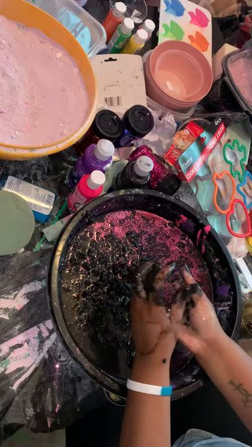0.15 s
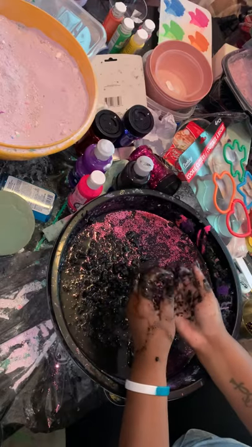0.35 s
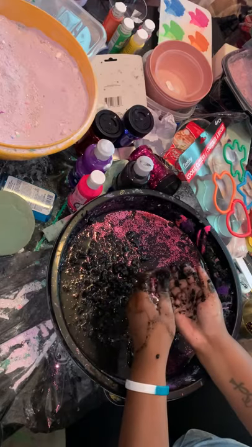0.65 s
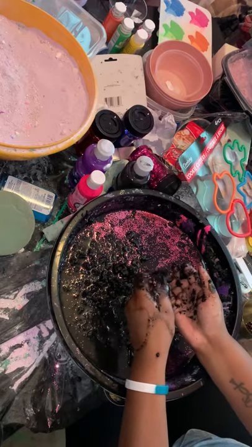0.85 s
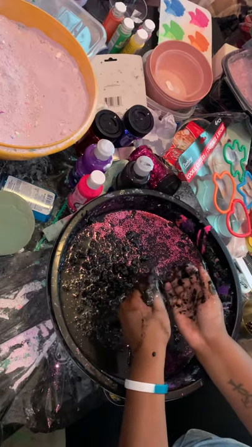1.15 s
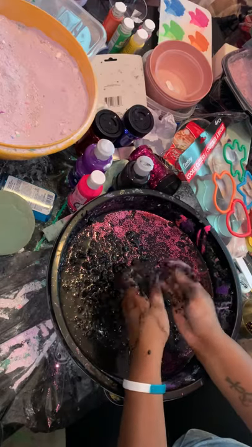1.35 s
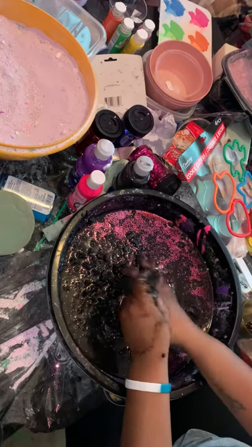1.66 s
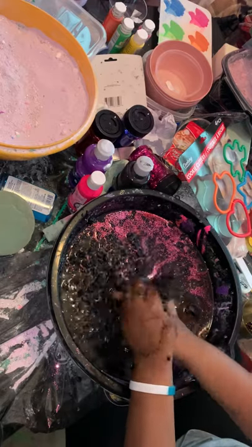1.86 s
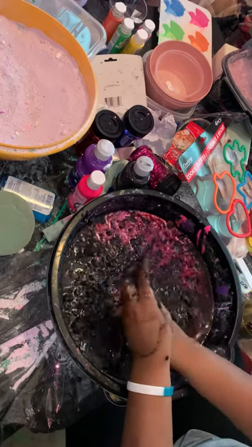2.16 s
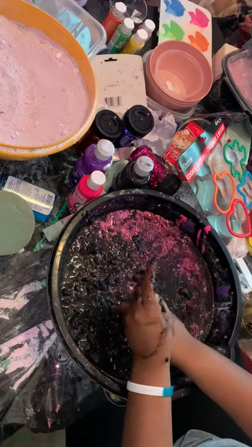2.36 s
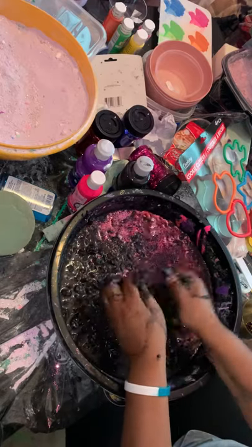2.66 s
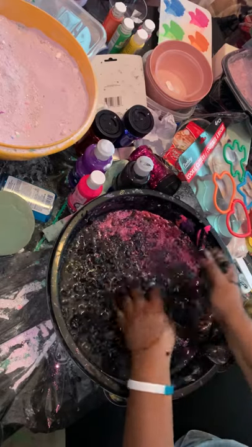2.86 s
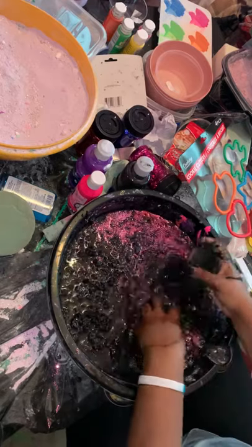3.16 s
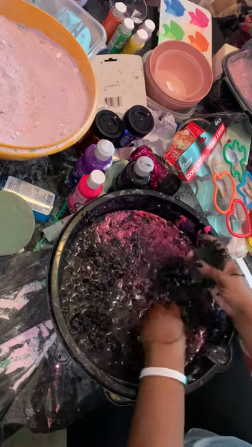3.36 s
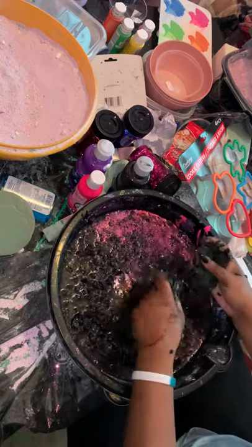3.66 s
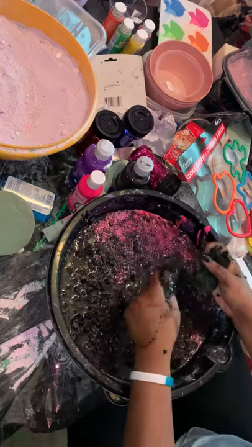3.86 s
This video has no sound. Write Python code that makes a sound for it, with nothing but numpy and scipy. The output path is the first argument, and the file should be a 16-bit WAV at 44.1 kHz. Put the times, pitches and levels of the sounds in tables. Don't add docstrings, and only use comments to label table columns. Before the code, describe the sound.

Hands knead soggy crumbly foam in a plastic tub, wet crackling with fizzy pops and snaps

```python
import sys
import numpy as np
from scipy import signal
from scipy.fft import rfft, irfft
from scipy.io import wavfile
from scipy.ndimage import uniform_filter1d, minimum_filter1d, map_coordinates

SR = 44100
rng = np.random.default_rng(int(sys.argv[2]) if len(sys.argv) > 2 else 0)


def transcribe(signal):
    frames = np.atleast_2d(signal).T
    limited = np.clip(frames, -1, 1)
    pcm = np.round(limited * 32767).astype(np.int16)
    wavfile.write(sys.argv[1], SR, pcm)


def invert_db(x):
    u = np.asarray(x, float) / 20
    return 10 ** u


N = 176400

# (frequency [Hz], level [dB])
FIZZ_COLOUR = [(900, -50), (2500, -26), (4200, -4.5), (5000, 1.5), (6800, -1.5), (9500, -1.5), (13000, -3),
               (15500, -10)]
# (frequency [Hz], level [dB])
POP_COLOUR = [(820, -48), (1200, -7), (1500, 0), (2200, -4), (3500, -5), (4600, -10), (7000, -25)]


def evened(x):
    return x / np.sqrt(np.mean(x ** 2) + 1e-20)


def read(points, hz):
    f, value = np.transpose(points)
    return np.interp(np.log(hz + 1), np.log(f + 1), value)


def curve(points, axis):
    rows = np.array(points)
    return np.interp(np.arange(N) / SR, rows[:, 0], rows[:, axis])


def colour(x, points):
    hz = np.abs(np.fft.fftfreq(8192, 1 / SR))
    below, above = (5, points[0][1] - 50), (SR / 2, points[-1][1] - 20)
    log_gain = np.log(invert_db(read([below] + list(points) + [above], hz)))
    taps = np.fft.ifft(np.exp(np.conj(signal.hilbert(log_gain)))).real[:4096]
    return signal.oaconvolve(x, taps)[:len(x)]


def tilt(x, hz, db):
    low = signal.sosfiltfilt(signal.butter(3, hz, fs=SR, output="sos"), x)
    return low + invert_db(db) * (x - low)


def add(mix, s, sound):
    part = mix[round(s * SR):][:len(sound)]
    part += sound[:len(part)]


def wander(per_s):
    knots = rng.standard_normal(1200)
    return evened(map_coordinates(knots, [np.arange(N) / SR * per_s], order=3))


def unsteady_turns(hz, noise):
    return np.cumsum(noise) * np.sqrt(hz / SR)


def grains(points, per_s, spread_db, cycles, clump_db, clump_per_s, hiss):
    loudness_db = spread_db * np.minimum(-np.log(rng.random(N) + 1e-9), 5)
    strikes = invert_db(loudness_db) * (rng.random(N) < per_s / SR)
    kind = rng.integers(0, 14, N)
    out = np.zeros(N)
    for k, hz in enumerate(np.geomspace(points[1][0], points[-2][0], num=14)):
        u = np.arange(600) / SR * hz
        ring = evened(u * np.exp(-4 * u / cycles) * np.sin(2 * np.pi * u))
        out += signal.oaconvolve(strikes * (kind == k), np.sqrt(hz) * ring)[:N]
    wet = evened(out) + hiss * rng.standard_normal(N)
    return evened(colour(wet, points) * invert_db(clump_db * wander(clump_per_s)))


def patchy(x, patchy_db):
    z = signal.stft(x, SR, nperseg=512)[2]
    field = rng.standard_normal(z.T.shape)
    field = uniform_filter1d(uniform_filter1d(field, size=9, axis=0), size=9, axis=1)
    return signal.istft(z * invert_db(patchy_db * evened(field).T), SR, nperseg=512)[1][:N]


def rumble():
    # (time [s], level [dB])
    swell = [(.05, -61.5), (.31, -64.5), (1.18, -58), (1.45, -70), (1.62, -61.5), (2.46, -63.5),
             (2.67, -67), (2.78, -64.5), (3.13, -54), (3.42, -67.5), (3.5, -60.5), (3.72, -65)]
    # (frequency [Hz], level [dB])
    rumble_colour = [(25, -63.5), (40, -20.5), (57, 2), (70, -7), (110, -10.5), (150, -19), (220, -33.5),
                     (400, -69)]
    level_db = 3.5 + curve(swell, axis=1) + 0.5 * wander(5.32)
    return invert_db(level_db) * evened(colour(rng.standard_normal(N), rumble_colour))


def microphone_hiss():
    # (frequency [Hz], level [dB])
    hiss_colour = [(5000, -14.5), (12500, -6.5)]
    return invert_db(-72.5) * evened(colour(rng.standard_normal(N), hiss_colour))


def diffuse(x):
    # (frequency [Hz], level [dB])
    diffuse_colour = [(60, -24), (250, -15), (700, -6), (1500, -11), (3000, -3), (5000, -7), (6500, -12),
                      (13000, -13)]
    # (frequency [Hz], time to fall 60 dB [s])
    room_t60 = [(200, 0.28), (1000, 0.17), (4000, 0.075), (12000, 0.0047)]
    taps = rng.choice([-1., 1.], (2, 8192)) * (rng.random((2, 8192)) < .06) * (np.arange(8192) > 40)
    hz, t, z = signal.stft(taps, SR, nperseg=256)
    decay = invert_db(-60 * t / read(room_t60, hz)[:, None])
    tail = signal.istft(z * decay, SR, nperseg=256)[1]
    tail = tail / np.linalg.norm(tail, axis=1)[:, None]
    return signal.fftconvolve(colour(x, diffuse_colour)[None], tail, axes=1)[:, :N]


def rubbing_and_flexing():
    # (time [s], rubbing level [dB], wall flexing level [dB])
    press = [(.39, -86, -85), (.48, -66, -59.5), (.64, -65, -68.5), (.7, -84, -77), (.79, -73, -76),
             (.815, -59, -56), (1.07, -62.5, -68.5), (1.15, -81, -81.5), (1.84, -77, -82.5),
             (1.88, -61.5, -58), (2.02, -76, -80.5), (2.35, -64.5, -79.5), (2.74, -69.5, -80.5),
             (2.95, -57.5, -78), (3.0, -48.5, -45.5), (3.13, -58.5, -61.5), (3.3, -77, -82.5),
             (3.42, -80, -83)]
    # (frequency [Hz], level [dB])
    rub_colour = [(350, -15.5), (550, -0.5), (750, 4.5), (1000, 9.5), (1400, 3), (2200, 2.5)]
    # (frequency [Hz], level [dB])
    wall_colour = [(100, -14), (200, 5.5), (300, 1.5), (420, 0), (550, -10.5), (900, -29)]
    rub = grains(rub_colour, 500, 4.1, 3.84, clump_db=2.5, clump_per_s=120, hiss=2.5)
    wall = grains(wall_colour, 400, 4.3, 2.7, clump_db=2.5, clump_per_s=18, hiss=2.6)
    return invert_db(curve(press, axis=1)) * rub + invert_db(curve(press, axis=2)) * wall


def clump_knocks():
    # (time [s], peak level [dB], pitch [Hz])
    clumps = [(0.426, -41, 1000), (0.502, -44.5, 413), (0.577, -38, 427), (0.806, -40, 974),
              (0.824, -41.5, 415), (0.883, -35.5, 343), (1.038, -39, 424), (1.862, -46.5, 410),
              (1.912, -30, 606), (2.976, -16, 710), (3.004, -16, 640), (3.031, -47, 600),
              (3.059, -28.5, 800), (3.067, -18, 473), (3.099, -30, 380), (3.122, -38, 700),
              (3.167, -37, 1190), (3.184, -41.5, 930), (3.198, -38.5, 870), (3.218, -45, 800),
              (0.545, -53, 600), (0.647, -54, 504), (1.773, -45, 815)]
    # (frequency [Hz], level [dB], time to fall 60 dB [s])
    tub_modes = [(104.8, 1, 0.089), (287, -5, 0.03), (415, -3, 0.029), (609, -10.5, 0.031), (773, 2, 0.013),
                 (832, 1.5, 0.01), (1222, 4, 0.0089), (1510, -3, 0.013), (2076, -1, 0.0078)]
    rise_cycles, favour_db_per_octave = 1.47, 5
    out, t = np.zeros(N), np.arange(6000) / SR
    for s, db, pitch_hz in clumps:
        knock = np.zeros(len(t))
        for hz, mode_db, t60 in tub_modes:
            detune, phase = rng.random(2)
            mode_db = mode_db - favour_db_per_octave * abs(np.log2(hz / pitch_hz))
            soft_start = 1 - np.exp(-(t * hz / rise_cycles) ** 2)
            ring = np.sin(2 * np.pi * (hz * (0.951 + 0.094 * detune) * t + phase))
            knock += invert_db(mode_db - 60 * t / t60) * soft_start * ring
        add(out, s, invert_db(db - 5.5) * knock / abs(knock).max())
    return out


def heel_thump():
    out, t = np.zeros(N), np.arange(6000) / SR
    u = t / 0.0087
    add(out, 3.088, invert_db(-37) * u * np.exp(1 - u) * np.sin(2 * np.pi * 99 * t))
    return out


def air_pockets():
    # (time [s], peak level [dB], pitch [Hz])
    pockets = [
        (1.245, -55, 894),
        (1.348, -54, 1810),
        (1.574, -46, 2010),
        (2.696, -45.5, 4120),
        (2.809, -48, 1960),
        (3.914, -40.5, 3050),
        (3.985, -47, 1530),
    ]
    length_s, pitch_sag = 0.0067, 0.076
    out, t = np.zeros(N), np.arange(900) / SR
    u = t / length_s
    shape = np.minimum(u * 4, 1) * np.exp(-2.5 * u ** 2)
    for s, db, hz in pockets:
        turns = np.cumsum(hz * (1 - pitch_sag * u)) / SR
        turns = turns + .08 * unsteady_turns(hz, rng.standard_normal(900))
        add(out, s, invert_db(db) * shape * np.sin(2 * np.pi * turns))
    return out


def cell_burst(hz, tearing, wet_db):
    rise_s, length_s = 0.0011, 0.0038
    t, noise = np.arange(900) / SR, rng.standard_normal(900)
    shape = np.minimum(t / rise_s, 1) * np.exp(-(t / length_s) ** 2 * 2)
    ring = shape * np.sin(2 * np.pi * hz * t + 0.25 * unsteady_turns(hz, noise))
    shape_rms = np.sqrt(np.mean(shape ** 2))
    tear = shape_rms * evened(colour(shape * noise, FIZZ_COLOUR))
    wet = shape_rms * evened(colour(shape * noise, POP_COLOUR))
    burst = ring + tearing * tear + invert_db(wet_db) * wet
    return burst / abs(burst).max()


def snaps():
    # (time [s], peak level [dB], pitch [Hz], low wet level [dB])
    large_cells = [(0.1685, -43.5, 8100, -83), (0.3147, -39, 1076, -47), (0.3875, -34.5, 6280, -48.5),
                   (0.7682, -42, 11470, -54.5), (0.8285, -38.5, 8140, -37), (0.9413, -36.5, 1620, -41),
                   (0.9747, -37.5, 1590, -42.5), (1.1243, -39.5, 6400, -55), (1.1600, -38.5, 12220, -47.5),
                   (1.2181, -41.5, 1574, -47.5), (1.6661, -38, 6900, -63), (1.7374, -41, 6430, -55),
                   (1.7709, -31.5, 6840, -47), (2.159, -38, 6930, -47.5), (2.3371, -30.5, 11570, -53),
                   (2.4379, -37.5, 1360, -49), (2.4743, -39, 6050, -51), (2.6329, -35.5, 7660, -67),
                   (2.796, -34, 2240, -74), (2.8749, -30, 1750, -71), (3.7454, -42.5, 2320, -50.5),
                   (3.8048, -33, 1404, -43), (3.9035, -32, 3370, -43), (3.9574, -30, 6850, -72)]
    out = np.zeros(N)
    for s, db, hz, wet_db in large_cells:
        add(out, s, invert_db(db + 2) * cell_burst(hz, tearing=1, wet_db=wet_db - db + 5.5))
    return out


def ticks():
    # (time [s], peak level [dB], pitch [Hz])
    small_cells = [(0.2396, -44, 6500), (0.2814, -37.5, 13280), (0.3455, -42, 13400),
                   (0.3914, -35.5, 11300), (0.5787, -40.5, 6780), (0.805, -41, 7300), (0.834, -32.5, 7580),
                   (0.892, -37, 7250), (1.0051, -32.5, 13000), (1.254, -44, 7700), (1.2833, -45.5, 6400),
                   (1.7538, -40, 7170), (2.2514, -41.5, 6360), (2.4588, -44, 6200), (2.515, -40, 4870),
                   (2.587, -54, 12000), (2.5974, -46, 10900), (2.612, -42, 7140), (2.6489, -36, 7180),
                   (2.673, -38.5, 12660), (2.7282, -45, 12200), (2.7616, -56, 6140), (2.7827, -37.5, 5740),
                   (2.8118, -37, 4440), (2.8394, -45, 13100), (2.8924, -39, 12350), (2.9632, -44, 6500),
                   (2.974, -38, 6900), (3.0014, -45, 6350), (3.0415, -49, 7150), (3.0833, -38.5, 6480),
                   (3.503, -48, 12960), (3.818, -36, 4280), (3.873, -45, 7010), (3.932, -37, 6100),
                   (3.948, -35, 7270)]
    out = np.zeros(N)
    for s, db, hz in small_cells:
        add(out, s, invert_db(db - 1) * cell_burst(hz, tearing=0.56, wet_db=-11.5))
    return out


def foam():
    # (time [s], effort level [dB], share of finest cells [dB])
    knead = [(.12, -84, 3.5), (.28, -68, 5.5), (.6, -69.5, -2.5), (.76, -77.5, -5), (.82, -58.5, -9),
             (1.09, -67, -4), (1.4, -78, 4), (1.52, -67.5, -0.5), (1.85, -69, -2.5), (2.06, -79, 2.5),
             (2.24, -64, -3.5), (2.36, -77.5, 1), (2.57, -76.5, -2), (2.64, -69, 2), (2.9, -70.5, 1.5),
             (3.3, -85, 6.5), (3.7, -84, -2), (3.9, -64.5, -3.5)]
    # (time [s], flow level [dB], brightness [dB])
    squeeze = [(.17, -87, -2), (.27, -68, -3.8), (.6, -65.5, 3.5), (.76, -73, 4.5), (.815, -58.5, 2.5),
               (1.09, -63.5, 5.5), (1.17, -66, -0.5), (1.43, -83.5, 6), (1.52, -65.5, 4.5),
               (1.72, -69.5, -4.5), (1.85, -71, 3.5), (2.06, -73.5, -9), (2.26, -69.5, -4),
               (2.57, -62.5, -0.5), (2.76, -77.5, 11.5), (3.3, -84, -5), (3.58, -81, 9), (3.85, -64.5, -2)]
    fizz = grains(FIZZ_COLOUR, 1500, 2.33, 5.2, clump_db=2.15, clump_per_s=24, hiss=2.3)
    pops = grains(POP_COLOUR, 1500, 2.34, 5.9, clump_db=3.17, clump_per_s=30, hiss=1.7)
    fizz = invert_db(curve(knead, axis=1) + 11.5) * tilt(fizz, 7800, curve(knead, axis=2))
    pops = invert_db(curve(squeeze, axis=1) + 2.14) * tilt(pops, 1980, curve(squeeze, axis=2))
    return patchy(fizz + pops, patchy_db=2.62)


def scene():
    # (frequency [Hz], phase [rad])
    port_lead = [(0, 0), (1600, 0), (2600, 2.6), (3600, .6), (5000, 3.3), (6900, 6.28), (15300, 15.71),
                 (18000, 18.7)]
    # (frequency [Hz], level difference [dB])
    port_tilt = [(60, -2), (240, -2.6), (950, -2), (3770, -0.68), (15000, 0)]
    tub = rubbing_and_flexing() + clump_knocks() + heel_thump()
    cells = air_pockets() + snaps() + ticks() + foam()
    near = rumble() + microphone_hiss() + tub + cells
    hz = np.fft.rfftfreq(N, 1 / SR)
    f, lead = np.transpose(port_lead)
    half = invert_db(read(port_tilt, hz) / 2) * np.exp(.5j * np.interp(hz, f, lead))
    return irfft(rfft(near) * np.array([half, 1 / half]), N) + diffuse(near)


def top_cut(x):
    return signal.sosfilt(signal.butter(12, 16500, fs=SR, output="sos"), x)


def record(dry):
    # (frequency [Hz], distance [dB])
    drop_under = [(1000, 22), (2500, 13), (5000, 13.5), (6500, 7), (13000, 6.5), (13300, 12), (13800, 12),
                  (14100, 1)]
    sharp_db, very_sharp_db, edge_hz, click_edge_hz = 17.5, 22, 16000, 16400
    pair = np.array([dry[0] + dry[1], dry[0] - dry[1]]) / 2
    pair = signal.oaconvolve(pair, signal.firwin(255, click_edge_hz, fs=SR)[None], "same")

    hz, t, z = signal.stft(pair, SR, nperseg=2048)
    starts = np.arange(0, len(hz), 16)
    power = uniform_filter1d(np.add.reduceat(abs(z) ** 2, starts, axis=1), size=3, axis=2)
    weak = power * invert_db(2 * read(drop_under, hz[starts]))[:, None] < power[::-1]
    kept = ~weak[:, np.arange(len(hz)) // 16] & (hz < edge_hz)[:, None]
    thin = signal.istft(z * kept, SR, nperseg=2048)[1][:, :N]

    treble = uniform_filter1d(np.diff(dry[0], prepend=0) ** 2, size=64)
    crest = treble / (uniform_filter1d(treble, size=4096) + 1e-20)
    brief = -minimum_filter1d(-crest, size=200)
    wide = -minimum_filter1d(-crest, size=1600)
    opened = (brief > invert_db(sharp_db)) | (wide > invert_db(sharp_db)) & (wide < invert_db(very_sharp_db))
    mid, side = thin + (pair - thin) * uniform_filter1d(opened * 1., size=128)
    return top_cut(np.array([mid + side, mid - side]))


dry = scene()
out = record(dry)
transcribe(out)
```